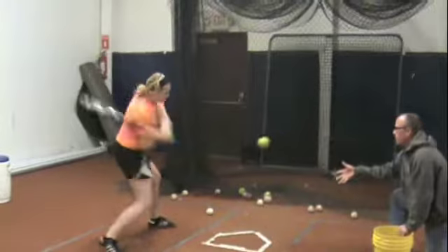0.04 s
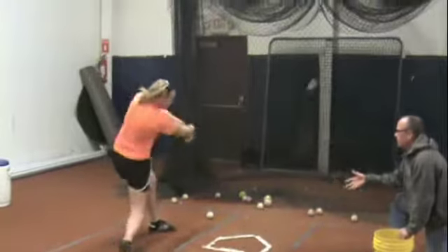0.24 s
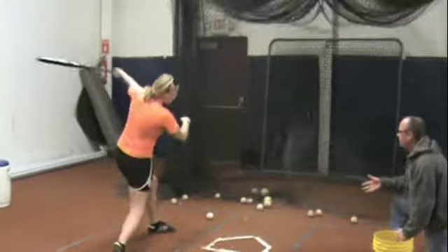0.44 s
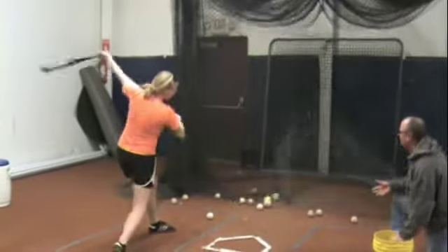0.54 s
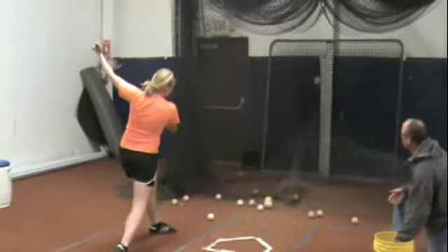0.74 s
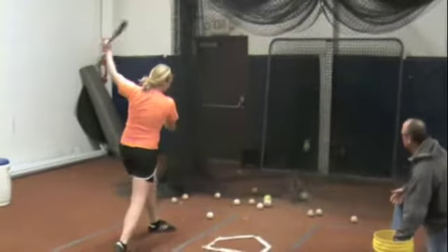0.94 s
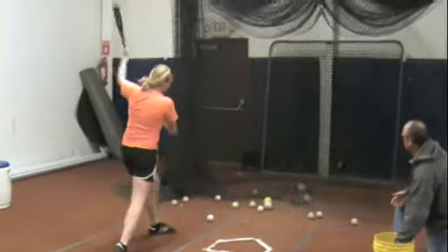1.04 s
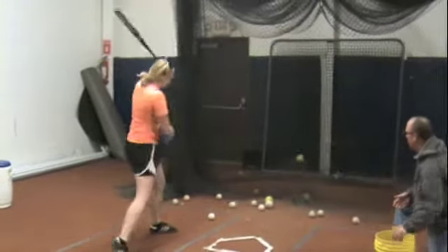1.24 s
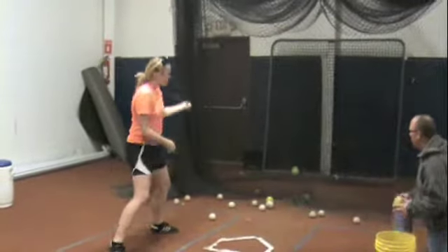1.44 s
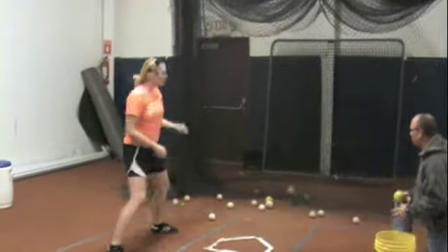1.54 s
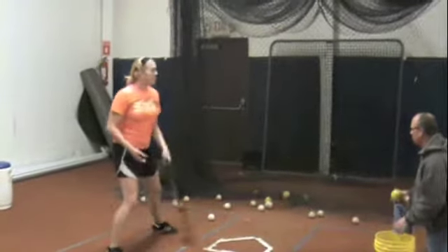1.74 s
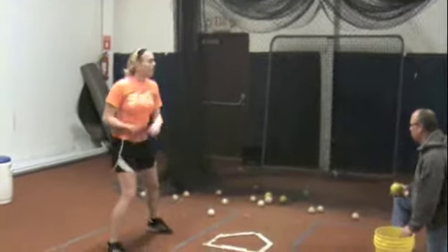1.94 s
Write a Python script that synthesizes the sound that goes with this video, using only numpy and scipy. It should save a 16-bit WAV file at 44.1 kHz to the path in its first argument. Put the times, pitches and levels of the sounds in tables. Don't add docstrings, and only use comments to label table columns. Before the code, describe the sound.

A bat strikes a ball at about 0.2 seconds: a loud, hard crack with a brief metallic barrel ring, flattened by a camera limiter and carried on by a large hard-walled hall. At 1.1 seconds the ball slaps and thuds on the floor, loose balls clattering and net cords rustling. A softer bounce follows at 1.65. Faint footfalls, low room air and slight hiss lie beneath.

```python
import sys
import numpy as np
from scipy import signal
from scipy.fft import rfft, irfft
from scipy.io import wavfile
from scipy.ndimage import uniform_filter1d

SR = 44100
rng = np.random.default_rng(int(sys.argv[2]) if len(sys.argv) > 2 else 0)


def boost(x):
    u = np.asarray(x, float) / 20
    return 10 ** u


def dump_mix(stems):
    frames = np.atleast_2d(stems).T
    limited = np.clip(frames, -1, 1)
    pcm = np.round(limited * 32767).astype(np.int16)
    wavfile.write(sys.argv[1], SR, pcm)


N = 88200


def evened(x):
    return x / np.sqrt(np.mean(x ** 2) + 1e-20)


def read(points, hz):
    f, value = np.transpose(points)
    return np.interp(np.log(hz + 1), np.log(f + 1), value)


def add(mix, s, sound):
    part = mix[round(s * SR):][:len(sound)]
    part += sound[:len(part)]


def causal(gain):
    cepstrum = irfft(np.log(gain))
    cepstrum[1:2048] *= 2
    cepstrum[2049:] = 0
    return irfft(np.exp(rfft(cepstrum)))


def colour(x, table):
    gain = boost(read(table, np.fft.rfftfreq(4096, 1 / SR)))
    return signal.oaconvolve(x, causal(gain))[:len(x)]


def pair(same, gain):
    hz = np.fft.rfftfreq(512, 1 / SR)[:, None]
    t = np.arange(N // 128 + 5) * 128 / SR
    a, b, c, d = rng.standard_normal((len(t), len(hz), 4)).T
    share = np.clip(read(same, hz), -1, 1)
    mid = np.sqrt(1 + share) * (a + 1j * b)
    side = np.sqrt(1 - share) * (c + 1j * d)
    spectra = np.array([mid + side, mid - side]) * gain(hz, t)
    return signal.istft(spectra, nperseg=512, noverlap=384)[1][:, :N]


# frequency in Hz, width in Hz, level in dB.
BARREL_MODES = [(626.8, 43.4, 2.5), (1156, 37, -2.5), (1134, 113, -4.5), (1750, 350, -14.5),
                (2360, 160, -16.5), (3310, 220, -16.5), (5600, 280, -26), (9000, 340, -26)]
# frequency in Hz, gain in dB.
BARREL_RADIATION = [(150, -3.5), (450, -2), (580, -2.5), (9500, 3)]
# frequency in Hz, level in dB.
CRACK_BROADBAND = [(150, -49), (330, -26.5), (520, -23), (900, -13.5), (1500, -23.5), (4000, -18.5),
                   (7000, -24.5), (10000, -34)]
CRACK_S, CRACK_DB = 0.2176, -2
SMEAR_S = 0.0024


def bat():
    hz = np.fft.rfftfreq(4096, 1 / SR)
    modes = sum(boost(2 * db) / (1 + (1.01 * (hz - f) / width) ** 2) ** 2 for f, width, db in BARREL_MODES)
    modes = modes * boost(2 * read(BARREL_RADIATION, hz))
    blow = causal(np.sqrt(modes + boost(2 * read(CRACK_BROADBAND, hz))))
    lag_s = SMEAR_S * np.interp(hz, np.linspace(0, SR / 2, 40), rng.random(40))
    phase = 2 * np.pi * np.cumsum(lag_s) * hz[1]
    blow = irfft(rfft(blow) * np.exp(-1j * phase))
    out = np.zeros(N)
    add(out, CRACK_S, blow / abs(blow).max())
    return boost(CRACK_DB) * out


def bumps(rows, turns):
    out = np.zeros(N)
    for s, db, hz, *sign in rows:
        u = np.arange(0, turns / hz, 1 / SR) * hz
        bell = np.sin(np.pi * u / turns) ** 2
        add(out, s, boost(db) * np.prod(sign) * bell * np.cos(2 * np.pi * (u - turns / 2)))
    return out


# start in seconds, level in dB, pitch in Hz, signed scale.
SKIN_SLAPS = [(1.110, -23, 740, 1), (1.1175, -5.5, 985, -0.61), (1.1248, -6, 880, -0.75),
              (1.139, -15, 1110, -1.17), (1.147, -19, 870, -1.28), (1.152, -11, 1020, 0.81),
              (1.1615, -16, 800, -1.04), (1.186, -10, 870, 0.51), (1.660, -10, 800, 0.096),
              (1.667, -23.5, 700, 0.52), (1.6695, -20.5, 583, 0.78), (1.6755, -30, 800, -0.36)]
SLAP_TURNS = 1.36
CORE_HZ, CORE_DECAY_S, CORE_DB = 787, 0.0017, -33.5


def slaps():
    t = np.arange(0, 0.03, 1 / SR)
    smack = bumps(SKIN_SLAPS, SLAP_TURNS)
    ring = np.exp(-t / CORE_DECAY_S) * np.cos(2 * np.pi * CORE_HZ * t)
    return smack + boost(CORE_DB) * signal.oaconvolve(smack, ring)[:N]


# start in seconds, level in dB, pitch in Hz.
FLOOR_THUDS = [
    (.198, -36.5, 150),
    (.592, -32, 141),
    (.768, -40, 135),
    (1.1022, -15.5, 184),
    (1.6518, -21.5, 186),
    (1.945, -31.5, 157.4),
]
THUD_TURNS = 1.73


def thuds():
    return bumps(FLOOR_THUDS, THUD_TURNS)


# start in seconds, fall in seconds, level in dB.
BALL_CLATTERS = [
    (1.11, 0.048, -19.5),
    (1.664, 0.036, -24),
]
KNOCK_PITCHES_HZ = (482, 800, 1130)
KNOCKS_PER_S = 700


def clatter():
    t = np.arange(N) / SR
    swell = sum(boost(db) * (t > s) * np.exp(-abs(t - s) / fall) for s, fall, db in BALL_CLATTERS)
    u = np.arange(0, 0.008, 1 / SR)
    hits = rng.standard_normal((N, 3)) * (rng.random((N, 3)) < KNOCKS_PER_S / SR / 3)
    out = np.zeros(N)
    for k, hz in enumerate(KNOCK_PITCHES_HZ):
        knock = np.sin(2 * np.pi * hz * u) * np.exp(-u * hz / 0.75)
        out += signal.oaconvolve(swell * hits[:, k], knock)[:N]
    return out


# start in seconds, rise in seconds, fall in seconds, level in dB.
NET_SWISHES = [
    (.0, 0.045, 0.6, -57),
    (0.901, 0.1, 0.16, -47.5),
    (1.1, 0.011, .12, -35.5),
    (1.18, 0.22, 0.13, -43.5),
    (1.658, 0.016, .05, -41),
    (1.72, 0.18, 0.72, -55.5),
]
# frequency in Hz, density in dB per Hz.
RUSTLE_COLOUR = [(900, -47.5), (2300, -13), (5400, -6), (8500, -13.5), (10500, -14.5), (16000, -10.5)]
# start in seconds, level in dB.
CORD_SNAPS = [(1.1028, -33), (1.110, -38), (1.1193, -46), (1.123, -34), (1.6668, -33), (1.673, -50),
              (1.675, -34), (1.68, -29), (1.688, -40), (1.697, -33), (1.709, -47), (1.712, -37)]
# frequency in Hz, gain in dB.
CORD_SNAP_COLOUR = [(1500, -35.5), (3500, -17), (5000, 5.5), (8000, 7.5), (10500, 0)]
SNAP_DECAY_S = 0.0014
GRAINS_PER_S, GRAIN_SPREAD_DB = 6000, 2


def net():
    t = np.arange(N) / SR
    swing = np.zeros(N)
    for s, rise, fall, db in NET_SWISHES:
        attack = np.clip((t - s) / rise, 0, 1) ** 2
        swing += boost(db) * attack * np.exp(-np.maximum(t - s - rise, 0) * 1.86 / fall)
    snaps = sum(boost(db) * (t > s) * np.exp(-abs(t - s) / SNAP_DECAY_S) for s, db in CORD_SNAPS)
    grains = boost(GRAIN_SPREAD_DB * np.minimum(rng.exponential(1, N), 3)) * (rng.random(N) < GRAINS_PER_S / SR)
    friction = grains * rng.choice([-1, 1], N) + 0.5 * rng.standard_normal(N)
    rustle = swing * evened(colour(friction, RUSTLE_COLOUR))
    return rustle + snaps * evened(colour(rng.standard_normal(N), CORD_SNAP_COLOUR))


# delay in seconds, level in dB.
WALL_ECHOES = [(.0035, -7), (.0088, -4), (.0165, -8), (.0232, -5), (.0278, -5), (.034, -10), (.047, -10)]
# frequency in Hz, t60 in seconds.
HALL_T60 = [(100, 0.53), (300, 2.16), (640, 1.917), (1200, 1.98), (2500, 1.42), (5000, 0.95), (9000, 0.52),
            (14000, 0.55)]
# frequency in Hz, left-right likeness.
HALL_LIKENESS = [(60, 0.57), (180, 0.94), (550, 0.7), (1650, 0.66), (4970, 0.94), (15000, 0.42)]
# frequency in Hz, depth in dB.
FLUTTER_DEPTH = [(500, .5), (2000, 0.5), (8000, 1)]
FLUTTER_S, FLUTTER_FADE_S = 0.1043, 0.44
BUILD_S, SCATTER_S = 0.021, 0.0008
CRACK_WET_DB, FLOOR_WET_DB, NET_WET_DB = 12.5, -1, -4


def hall(x, wet_db, tint):
    def decay(hz, t):
        flutter = np.cos(2 * np.pi * t / FLUTTER_S) * np.exp(-t / FLUTTER_FADE_S)
        return boost(read(tint, hz) - 60 * t / read(HALL_T60, hz) + read(FLUTTER_DEPTH, hz) * flutter)

    tail = pair(HALL_LIKENESS, decay)
    tail *= 1 - np.exp(-np.arange(N) / SR / BUILD_S)
    room = boost(wet_db) * tail / np.linalg.norm(tail[0])
    room[:, 0] = 1
    fade = np.exp(-np.arange(200) / SR / SCATTER_S)
    for delay, db in WALL_ECHOES:
        blur = (rng.standard_normal(200) + 0.5 * rng.standard_normal((2, 200))) * fade
        echo = boost(db + wet_db - CRACK_WET_DB) * blur / np.linalg.norm(blur[0])
        room[:, round(delay * SR):][:, :200] += echo
    return signal.fftconvolve(x[None], room, axes=1)[:, :N]


# frequency in Hz, density in dB per Hz.
AIR_COLOUR = [(12, -35), (20, 1.5), (111, -6.5), (208, -12), (1130, -14.5), (1750, -18.5), (2050, -20.5),
              (10000, -32.5), (13000, -65), (22000, -120)]
# frequency in Hz, left-right likeness.
AIR_LIKENESS = [(60, 1.0), (240, 1), (950, 0.71), (3770, 0.5), (15000, 0.4)]
AIR_DB = -50.5


def air():
    return boost(AIR_DB) * evened(pair(AIR_LIKENESS, lambda hz, t: boost(read(AIR_COLOUR[:-1], hz) + 0 * t)))


# frequency in Hz, gain in dB.
FLOOR_TINT = [(60, -16.5), (200, -2), (320, 1), (700, -0.5), (1300, -1), (1800, -10), (3000, 2)]


def scene():
    flat = [(1, 0), (2, 0)]
    floor = slaps() + clatter() - thuds()
    quiet = air()
    crack_in_hall = hall(bat(), CRACK_WET_DB, flat)
    floor_in_hall = hall(floor, FLOOR_WET_DB, FLOOR_TINT)
    net_in_hall = hall(net(), NET_WET_DB, flat)
    return crack_in_hall + floor_in_hall + net_in_hall + quiet


# frequency in Hz, density in dB per Hz.
HISS_COLOUR = [(3000, -20), (9000, -17), (12000, 4), (14000, -4), (15500, 4), (15850, -17), (15950, -63)]
# frequency in Hz, left-right likeness.
HISS_LIKENESS = [(8000, .3), (11000, -.3), (13500, 0.22), (15000, .8)]
HISS_DB = -67


def hiss():
    return boost(HISS_DB) * evened(pair(HISS_LIKENESS, lambda hz, t: boost(read(HISS_COLOUR, hz) + 0 * t)))


LIMIT_DB, SQUEEZE, RECOVER_DB_PER_S = -17, 0.72, 124


def limiter(x):
    power_db = 10 * np.log10(abs(uniform_filter1d((x ** 2).mean(0), size=300)) + 1e-12)
    fall = np.arange(N) * RECOVER_DB_PER_S / SR
    held_db = np.maximum.accumulate(power_db + fall) - fall
    over_db = np.maximum(held_db - LIMIT_DB, 0)
    return np.tanh(x / boost(SQUEEZE * uniform_filter1d(over_db, size=120)))


def top_cut(x):
    return signal.sosfilt(signal.butter(12, 16810, fs=SR, output="sos"), x)


# frequency in Hz, gain in dB.
MIC_RESPONSE = [(9000, 2), (10300, -0.5), (11300, -14), (12200, -51), (16000, -54)]
# frequency in Hz, left minus right in dB.
MIC_LEAN = [(60, 1), (240, 0.3), (950, 2.2), (2500, 0), (9000, -0.9)]
EDGE_HZ = 15890


def record(dry):
    hz = np.fft.rfftfreq(N, 1 / SR)
    lean = read(MIC_LEAN, hz) / 2
    response = boost(np.array([lean, -lean]) + read(MIC_RESPONSE, hz))
    x = limiter(irfft(rfft(dry) * response, N) + hiss())
    mix = irfft(rfft(x) * (hz < EDGE_HZ), N)
    return top_cut(mix)


dry = scene()
out = record(dry)
dump_mix(out)
```